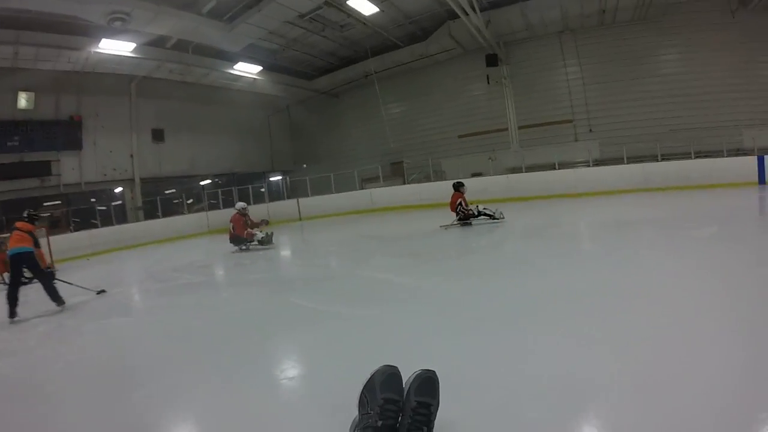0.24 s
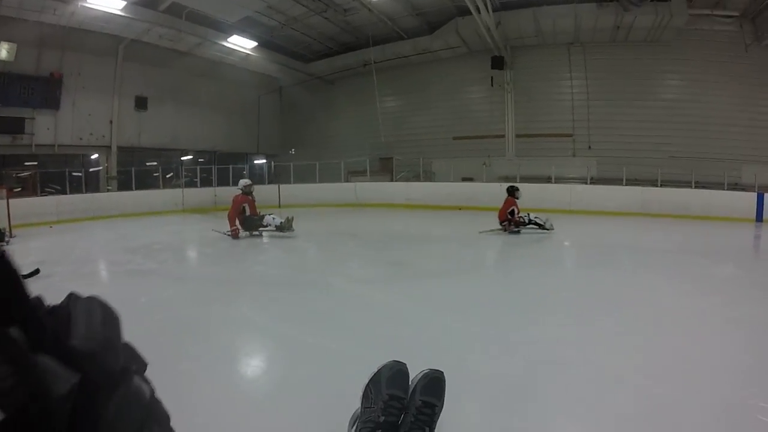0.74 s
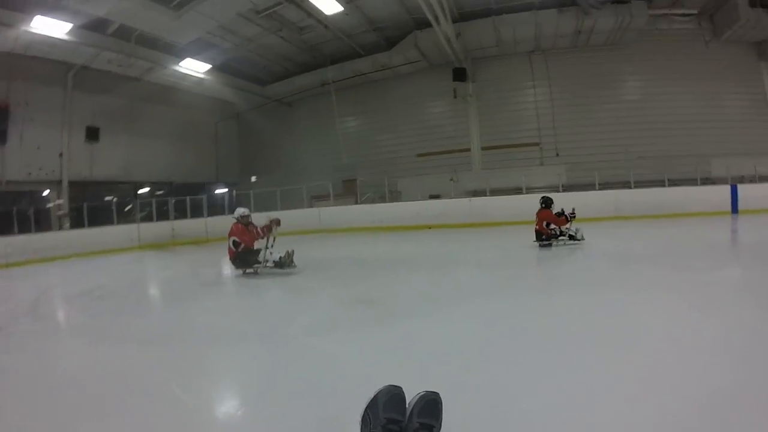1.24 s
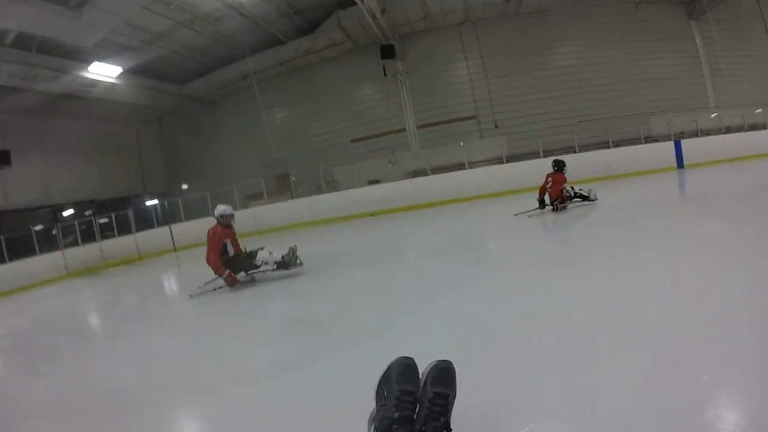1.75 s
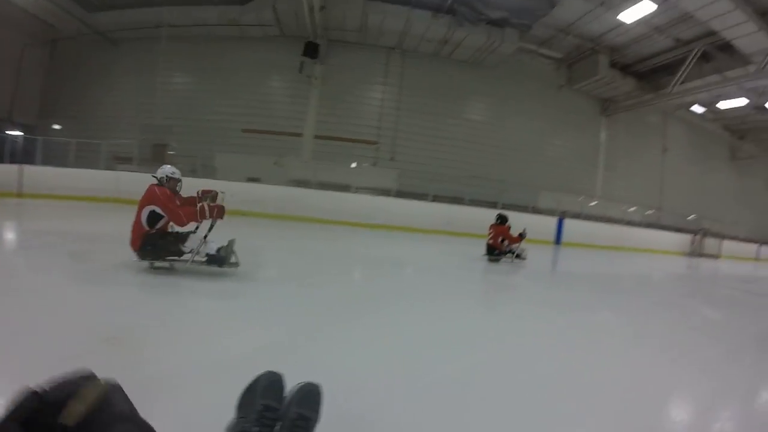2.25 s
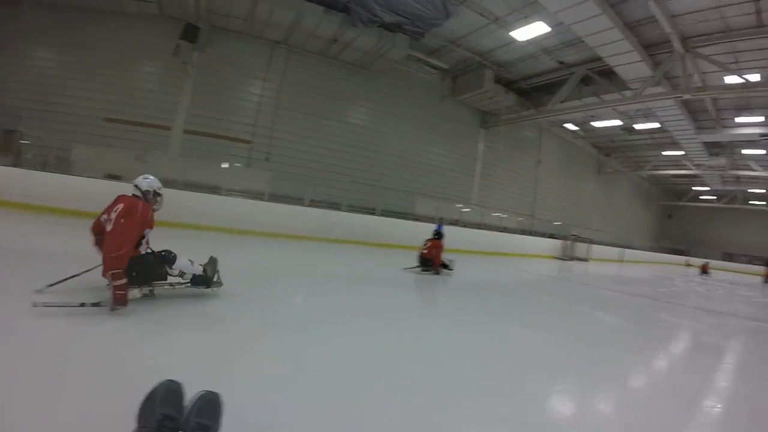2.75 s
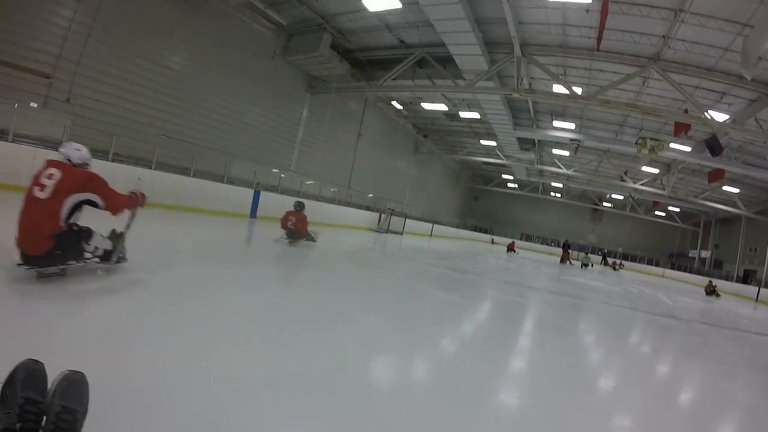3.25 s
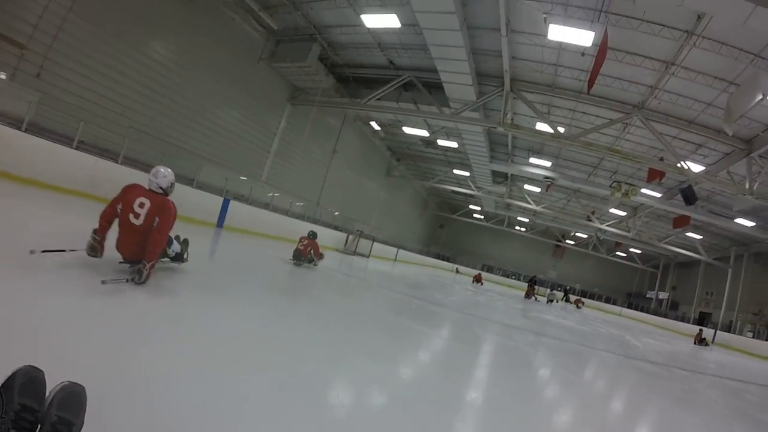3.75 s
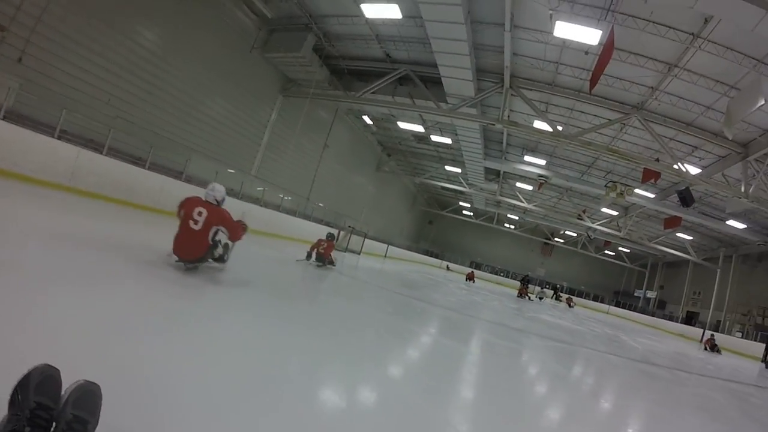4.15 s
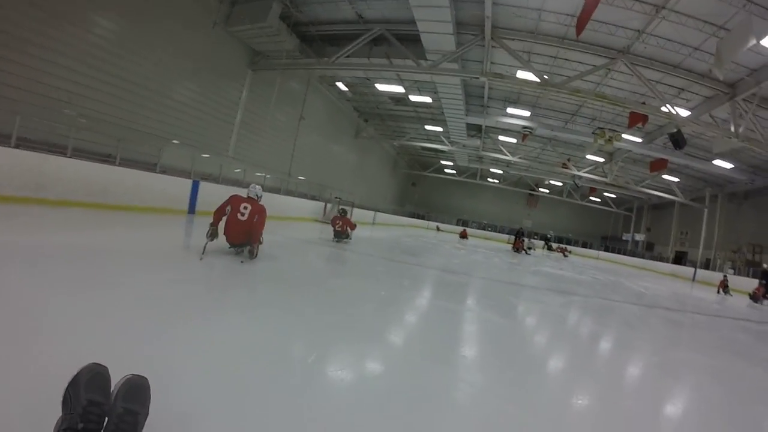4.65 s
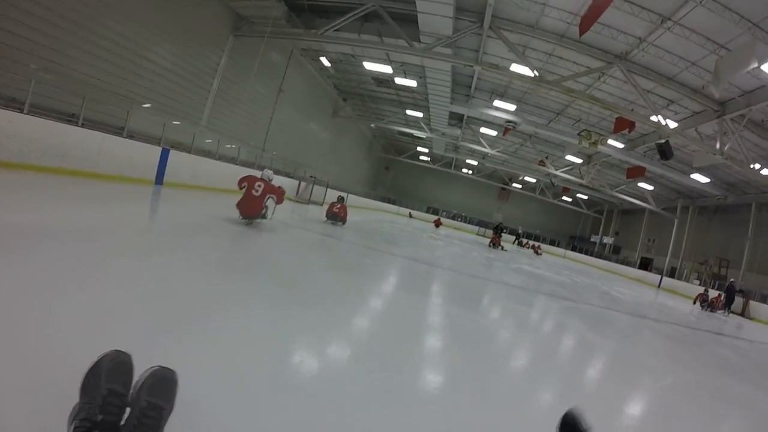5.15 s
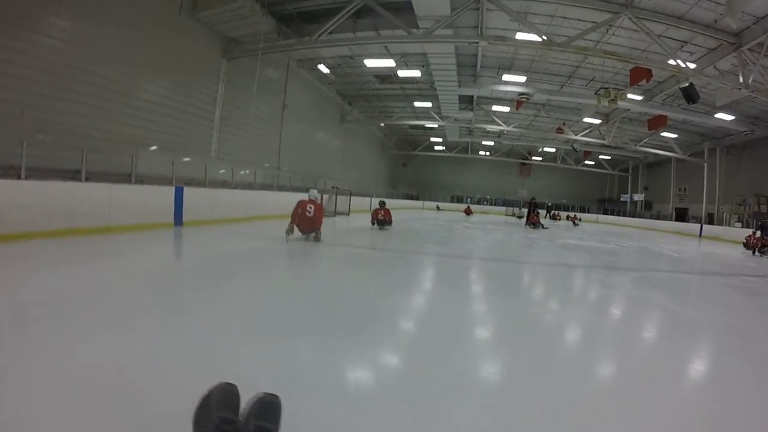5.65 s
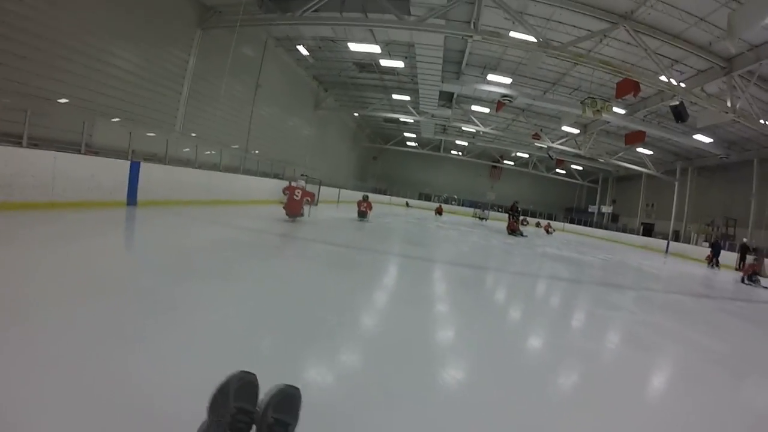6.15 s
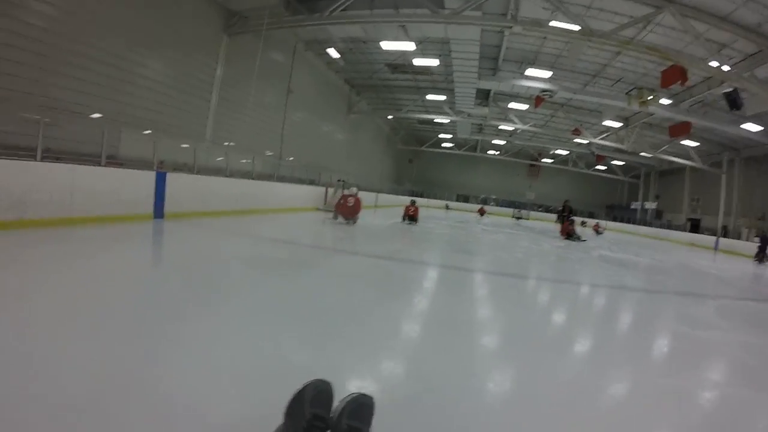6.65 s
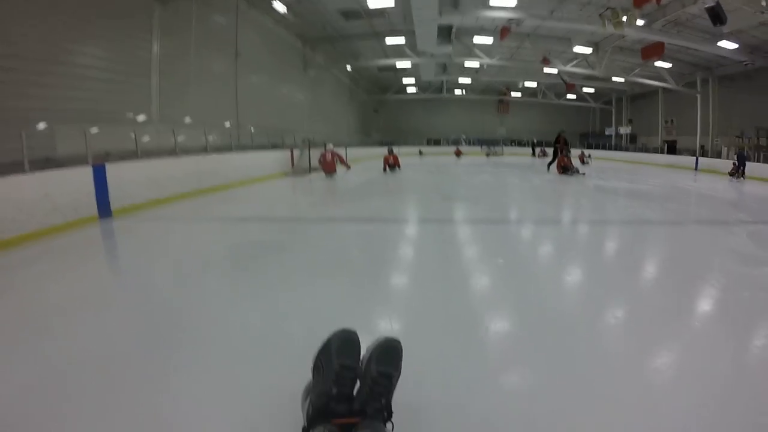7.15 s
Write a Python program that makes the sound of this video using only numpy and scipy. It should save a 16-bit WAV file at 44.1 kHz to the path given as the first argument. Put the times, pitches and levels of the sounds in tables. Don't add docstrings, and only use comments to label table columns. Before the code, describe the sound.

A hockey sled glides over indoor rink ice with low rumble and blade scrape, clicking picks, dull knocks and two heavy thumps.

```python
import sys
import numpy as np
from scipy import signal
from scipy.fft import rfft, irfft
from scipy.io import wavfile

SR = 44100
rng = np.random.default_rng(int(sys.argv[2]) if len(sys.argv) > 2 else 0)


def magnitude_from_level(level_db):
    exponent = np.asarray(level_db, float) / 20
    return 10 ** exponent


def log_audio(samples):
    frames = np.atleast_2d(samples).T
    limited = np.clip(frames, -1, 1)
    pcm = np.round(limited * 32767).astype(np.int16)
    wavfile.write(sys.argv[1], SR, pcm)


N = 326340

# frequency in Hz, level in dB.
WALLS = [(250, -2.5), (390, -6), (1180, -10.5), (1890, -4), (2740, -1), (3300, -1.5), (3740, -11.5),
         (4910, -19.5), (6800, -23), (7800, -26), (9500, -27), (11500, -37), (15000, -49)]
# centre in Hz, width in Hz, lift in dB.
CAVITIES = [(645, 200, -1), (1560, 403, 12), (2270, 330, 6.5), (3094, 91, 3), (4360, 660, 10.5),
            (5870, 1370, 11)]

# widest swing in seconds, level in dB, pitch in Hz, half length
# in seconds.
SWINGS = [(0.017, -33.5, 56, 0.025), (0.1, -37.5, 46.0, 0.03), (0.211, -31, 53.3, 0.073),
          (0.425, -36, 52.0, 0.041), (0.53, -28.5, 48.3, 0.081), (0.654, -31, 49.8, 0.045),
          (0.73, -25.5, 53.4, 0.026), (0.788, -28, 51.4, 0.042), (0.914, -31.4, 54, 0.036),
          (1.052, -22.5, 49.4, 0.06), (1.241, -35, 49.7, 0.059), (1.406, -30.5, 48.4, 0.042),
          (1.792, -31, 51.7, 0.051), (1.944, -34.5, 54, 0.055), (2.031, -36.5, 50.5, 0.049),
          (2.128, -31, 51.2, 0.041), (2.289, -28.5, 48.6, 0.029), (2.347, -32, 53.5, 0.03),
          (2.472, -35, 51, 0.053), (2.554, -30, 52.5, 0.051), (2.81, -32, 53.3, 0.064),
          (3.055, -28.5, 50.7, 0.095), (3.474, -29.5, 48.4, 0.041), (3.624, -37, 55.1, 0.054),
          (3.717, -31.0, 52.3, 0.029), (3.792, -33.0, 52, 0.016), (3.846, -32, 45, 0.036),
          (3.984, -30, 52.3, 0.076), (4.106, -29.5, 52.3, 0.022), (4.202, -35, 53.3, 0.054),
          (4.308, -30.5, 46.7, 0.027), (4.435, -33, 47.5, 0.11), (4.679, -34.7, 56.7, 0.031),
          (4.898, -27.5, 51.7, 0.024), (5.066, -32.5, 52.4, 0.051), (5.401, -28, 48, 0.021),
          (5.492, -31.5, 46, 0.038), (5.626, -36, 53.3, 0.034), (5.673, -34, 49, 0.048),
          (5.779, -34.2, 48.4, 0.026), (5.892, -31.5, 44.7, 0.026), (6.015, -33.5, 47.2, 0.11),
          (6.11, -31, 51, 0.041), (6.24, -32.5, 51, 0.036), (6.366, -33.4, 52.5, 0.06),
          (6.59, -32.4, 47.8, 0.044), (6.893, -37, 46, 0.036), (6.971, -35, 48.4, 0.028),
          (7.026, -36, 46.7, 0.024), (7.083, -31.5, 51.3, 0.026),
          (1.329, -38, 50.0, 0.031), (1.486, -34, 47.8, 0.034), (2.682, -36, 51, 0.06),
          (2.93, -31.5, 52.0, 0.025), (3.22, -43, 49, 0.057), (3.339, -37, 50.5, 0.043),
          (4.372, -28, 50.0, 0.022), (4.53, -37.5, 52.0, 0.023), (4.604, -37, 50.0, 0.036),
          (4.782, -41.5, 50.0, 0.053), (5.19, -40.5, 50.4, 0.033), (5.296, -41.5, 49.5, 0.049),
          (6.471, -42.5, 52.4, 0.035), (7.17, -38, 48.3, .035), (7.259, -39, 50.0, 0.034),
          (7.359, -40, 51, 0.034)]
STILL_DB, FALL_OVER_RISE = -51, 0.89
HARD_JOLT_DB = -15
KICK_HZ, KICK_DB, KICK_SHARE = 50.7, -16.5, 0.56
KICK_LAG_S, KICK_RISE_S, KICK_FALL_S = 0.01, 0.01, 0.069

# time in seconds, level in dB.
BUMPS = [(0.0, -58), (0.49, -58.5), (1.19, -55.5), (1.44, -48.5), (1.89, -59.5), (2.53, -53), (2.97, -54),
         (3.52, -57), (3.83, -54), (4.66, -58), (5.07, -54.5), (5.13, -54.5), (5.59, -52.5), (5.93, -54.5),
         (6.37, -58), (6.62, -50), (7.03, -55.5), (7.4, -55)]
# centre in Hz, width in Hz, level in dB.
FRAME_MODES = [(69, 20, -1.5), (107, 38, -10), (173.2, 25, 2.5), (256, 39, -4)]

# start in seconds, level in dB, length in seconds, edge brightness in dB.
STROKES = [(-.05, -43.5, 0.15, 2.5), (0.606, -51.5, 0.35, 9), (0.928, -42, 0.12, -3), (1.084, -46, 0.15, 2),
           (1.24, -48.5, 0.16, -8), (1.45, -56.5, 0.25, 15.5), (1.703, -45.5, 0.39, 5.5),
           (2.36, -49, 0.31, 7.5), (2.76, -45, 0.68, 0), (3.435, -44, 0.22, -2.5), (3.787, -39.5, 0.35, 3),
           (4.34, -42, 0.23, 3), (4.456, -42, 0.36, 0.5), (4.617, -49.5, 0.16, -9), (4.817, -51, 0.41, -18),
           (5.21, -45.5, 0.11, 2), (5.31, -42.5, 0.32, 1.5), (5.693, -39.5, 0.43, -0.5),
           (5.996, -42, 0.57, -1.5), (6.797, -44.5, 0.22, 1), (7.19, -49, 0.3, 10)]
STROKE_ATTACK_S, STROKE_RELEASE_S = 0.051, 0.21
# steady glide in dB, stroke in dB, share of edge brightness as a ratio.
BLADE_BANDS = [
    (-55.5, -12.5, -0.27),
    (-50, -3.5, -0.18),
    (-57.5, -10.5, 0.74),
    (-79, -32.5, 0.96),
]
BAND_EDGES_HZ = [320, 1250, 3700, 7500]

HISS_DB = -74

# time in seconds, peak in dB, pitch in Hz, rattle share in dB, seat share in dB.
KNOCKS = [(0.293, -31.5, 183, -26, -20), (0.486, -27, 153, -16.5, -14), (0.831, -44.5, 162, -6, 2.5),
          (0.888, -25, 180, -23, -18), (1.238, -25.5, 156, -12, -11.5), (1.407, -30.5, 139, -18, -28),
          (1.449, -29, 177, -36, -28), (1.631, -31.5, 187, -9.5, -5), (2.115, -24.5, 159, -11, -10.5),
          (2.461, -23.5, 206, -22.5, -11.5), (2.826, -26, 154, -12, -13.5), (2.962, -27.5, 165, -13.5, -6),
          (3.261, -25, 183, -30, -21), (3.768, -36, 238, -26, -6), (3.869, -29, 176, -30, -12),
          (4.843, -42, 202, -30, -15), (3.717, -31, 138, -31, -15), (3.815, -19.5, 216, -36, -12.5),
          (4.275, -22.5, 175.7, -43, -40), (4.459, -25.5, 157, -45, -18), (6.356, -29.5, 187, -15.5, -12),
          (6.532, -27.5, 184, -26, -25), (6.595, -27.5, 148, -29, -15), (6.711, 0, 168.5, -44, -27),
          (6.753, -25, 154, -15.5, -11.5), (7.26, -33, 221, -17, -13.5), (7.359, -27.5, 157, -25, -14)]
# time in seconds, peak in dB, rattle share in dB, seat share in dB.
THUDS = [(0.135, -36, -32, -25), (0.653, -38, -30, -25), (3.095, -37, -28, -25), (3.613, -50, -32, -25),
         (4.354, -31.5, -30, -27), (5.581, -31, -26, -25), (6.637, -24.5, -29, -26),
         (0.448, -44.5, -6.5, 3), (1.541, -10, -22.5, -21), (2.137, -27, -40, -25),
         (2.364, -29.5, -32, -19), (2.658, -36, -16.5, -28), (4.3, -40, -35, -24),
         (5.388, -27.5, -22, -18.5), (5.508, -28, -26.5, -20.5), (5.91, -26, -29, -17.5),
         (7.11, -32.5, -27, -24), (7.174, -34, -23, -12)]
# frequency in Hz, level in dB, t60 in seconds.
RATTLE_MODES = [(302, 5, 0.011), (454, 6.5, 0.017), (500, 3.5, 0.015), (558, -11.5, 0.063), (704, 3, 0.016),
                (864, -14, 0.027), (1104, -4, 0.015)]
THUD_HZ, SEAT_HZ = 109.7, 253.5
KNOCK_T60_S, SEAT_T60_S = 0.084, 0.073
SOFT_CONTACT_S, HARD_CONTACT_S = 0.016, 0.0095

# time in seconds, peak in dB, ring in Hz.
CHIPS = [(0.138, -37.5, 7180), (0.628, -35.5, 5900), (0.6454, -38, 5800), (0.963, -46, 5380),
         (0.9832, -30.5, 6420), (1.0081, -42, 5850), (1.0859, -36, 5730), (1.1605, -27.5, 5700),
         (1.282, -47, 5740), (1.3887, -53, 5700), (1.4195, -37.5, 6070), (1.495, -42, 5730),
         (1.7729, -40, 5660), (2.036, -40, 6400), (2.165, -46, 5780), (2.2992, -40, 6090),
         (2.4039, -41, 5880), (2.4324, -37, 5210), (2.6673, -45, 5510), (2.801, -44, 5740),
         (2.81, -40, 5990), (2.9512, -48, 5830), (3.0565, -40.5, 6230), (3.146, -42, 5050),
         (3.4037, -38, 5680), (3.4425, -41, 5610), (3.4605, -47, 5630), (3.4725, -46, 5690),
         (3.5159, -48, 5620), (3.5448, -45, 5580), (3.5593, -40, 5640), (3.8282, -40, 5940),
         (4.0532, -40, 5690), (4.2645, -33.5, 5500), (4.3809, -46, 5620), (4.4458, -39, 5870),
         (4.813, -46, 5800), (4.942, -39, 6000), (5.3542, -35, 5820), (5.391, -37.5, 5900),
         (5.7173, -43, 5850), (5.9983, -37, 6150), (6.0232, -44, 5670), (6.4418, -52, 5420),
         (6.5909, -37, 5840), (6.6174, -34, 6170), (6.8964, -38, 5750), (7.1831, -43, 5920),
         (7.25, -39, 5530), (7.268, -38, 6120)]
# time in seconds, peak in dB, ring in Hz.
SPLINTERS = [(0.627, -56, 8860), (0.6669, -61, 8870), (0.9817, -53, 8550), (1.0859, -55, 8770),
             (1.1603, -51, 9300), (1.282, -62, 9210), (1.3254, -57, 9110), (1.3872, -66, 10200),
             (1.4192, -55, 8680), (2.0926, -53, 10400), (2.2997, -57, 8880), (2.4329, -53, 8650),
             (2.6469, -58, 9190), (2.6673, -53, 9720), (2.6933, -55, 8720), (2.7911, -56, 8640),
             (2.9048, -80, 10500), (2.9497, -65, 8820), (3.018, -65, 8790), (3.055, -51, 9210),
             (3.1457, -49, 8800), (3.4027, -51, 9630), (3.8122, -51, 8770), (3.9913, -60, 8850),
             (4.0512, -53, 8790), (4.136, -56, 8770), (4.2703, -47, 10700), (4.3445, -57, 9650),
             (4.4463, -51, 8710), (4.9407, -71, 8710), (5.227, -65, 8540), (5.3502, -52, 9220),
             (5.3906, -53, 8880), (5.4365, -56, 8610), (5.6979, -58, 8660), (5.7199, -58, 8590),
             (6.0212, -64, 9050), (6.0581, -62, 8870), (6.2048, -59, 8920), (6.5924, -55, 9340),
             (6.6164, -50, 8950), (6.8952, -52, 8860), (7.1826, -62, 8640), (7.2509, -49, 8630),
             (7.2694, -56, 8540)]
# time in seconds, length in seconds.
SPRAYS = [(0.982, 0.0041), (1.157, 0.015), (4.266, 0.0039), (3.053, 0.011), (1.7, 0.0087), (4.6, 0.0052)]

# time in seconds, peak in dB, strongest ring in Hz, sharp edge share in dB.
PICKS = [(0.9838, -31, 3200, -11), (1.0859, -41, 3300, -11), (1.1614, -36, 2940, -11),
         (2.088, -39, 3300, -8.5), (0.1404, -36, 2530, -16), (1.7394, -34, 2400, -30),
         (1.852, -32, 2800, -28), (2.393, -32.5, 2220, -23), (2.5338, -35.5, 1530, -30),
         (2.9243, -34.5, 1520, -28), (3.2355, -33, 2350, -30), (3.265, -33, 2420, -19),
         (3.5133, -31, 1530, -28), (3.5447, -32, 1570, -22), (4.6374, -32.5, 1510, -30),
         (4.68, -37, 1560, -11), (5.229, -34, 2250, -27), (5.3893, -36, 3200, -18), (5.951, -33, 3120, -14),
         (7.1125, -39, 1490, -23), (0.3087, -31, 1460, -25), (0.3863, -27.5, 1490, -31),
         (0.625, -39, 1440, -26), (1.42, -35.5, 1450, -14), (2.146, -22, 1560, -28),
         (2.4015, -28, 3020, -15), (2.4349, -32, 2200, -13.5), (2.6242, -32, 1430, -25),
         (2.7836, -33.5, 2260, -35), (3.145, -32.5, 3140, -17), (3.443, -26, 1600, -36),
         (3.812, -36, 2295, -18), (4.0528, -35, 1670, -7), (4.144, -30.5, 1580, -29),
         (4.27, -28.5, 2620, -23.5), (5.354, -25.5, 1410, -9), (5.7004, -29, 2620, -14.5),
         (5.7338, -25.5, 2600, -20), (5.7658, -31, 1880, -15), (6.0007, -19.5, 2300, -38),
         (6.024, -23, 2460, -37), (6.5909, -28, 1620, -9), (6.6165, -29.5, 2760, -12),
         (6.755, -32.5, 1480, -19), (6.8214, -34, 2690, -21.5), (6.894, -36.5, 3200, -8),
         (7.1894, -34.5, 2300, -14), (7.269, -29.5, 2380, -8), (7.2842, -24.5, 2900, -38),
         (7.3062, -31, 1390, -32)]
# time in seconds, peak in dB, strongest ring in Hz, sharp edge share in dB.
TAPS = [(.965, -15.5, 1720, -16.5), (1.006, -45, 1490, -17), (1.5444, -28.5, 1630, -25),
        (3.0473, -29.5, 2280, -21), (4.263, -27.5, 1560, -5.5), (6.0503, -26.5, 1410, -23),
        (6.2401, -28, 2570, -18), (6.315, -31, 2230, -8), (6.4616, -26.5, 2270, -22),
        (7.2516, -23, 2307, -36), (7.3388, -35, 1417, -9)]
POINT_KNOCK_DB, FLAT_KNOCK_DB = -16, -10
POINT_SNAP, FLAT_SNAP = 2.5, 8
HALL_T60_S, HALL_DB, HALL_GAP_S = 0.83, -16.5, 0.032

# start in seconds, level in dB, length in seconds, centre in Hz.
SKIDS = [(1.75, -78.5, .42, 10400), (1.75, -90, .4, 13000), (1.75, -67, .3, 7100), (1.49, -62, .06, 5900),
         (4.33, -77, .3, 9600), (6.08, -79, .25, 8800), (6.98, -87, .08, 11500), (.97, -90, .15, 13000)]
SKID_WIDTH = 0.14

# time in seconds, level in dB, t60 in seconds.
FAR_SLAPS = [
    (1.0, -64, 0.44),
    (6.045, -40.5, 4),
]


def rms_one(x):
    return x / np.sqrt(np.mean(x ** 2) + 1e-20)


def in_time(rows):
    s, *columns = np.transpose(rows)
    return [np.interp(np.arange(N) / SR, s, c) for c in columns]


def drift(rate_hz):
    r = np.exp(-80 * np.pi * rate_hz / SR)
    slow = signal.lfilter([1], [1, -2 * r, r * r], rng.standard_normal(N // 40 + 2002))[2000:]
    return np.interp(np.arange(N) / 40, np.arange(len(slow)), rms_one(slow))


def passband(x, low_hz, high_hz, order=2):
    return signal.sosfilt(signal.butter(order, [low_hz, high_hz], "band", fs=SR, output="sos"), x)


def resonance(x, hz, width_hz):
    r = np.exp(-np.pi * width_hz / SR)
    poles = [1, -2 * r * np.cos(2 * np.pi * hz / SR), r * r]
    return signal.lfilter([(1 - r * r) / 2, 0, (r * r - 1) / 2], poles, x)


def add(track, s, sound, peak_db):
    at = round(s * SR)
    sound = sound[:N - at]
    track[at:at + len(sound)] += magnitude_from_level(peak_db) * sound / np.max(np.abs(sound))


def housing_response(size=2048):
    hz = np.maximum(np.fft.rfftfreq(size, 1 / SR), 1)
    wall_hz, wall_db = np.transpose(WALLS)
    level_db = np.interp(np.log(hz), np.log(wall_hz), wall_db)
    for top_hz, width_hz, lift_db in CAVITIES:
        level_db = level_db + lift_db / (1 + (2 * (hz - top_hz) / width_hz) ** 2)
    cepstrum = irfft(np.log(magnitude_from_level(level_db)))
    cepstrum[1:size // 2] *= 2
    cepstrum[size // 2 + 1:] = 0
    return irfft(np.exp(rfft(cepstrum)))[:size // 2]


def wobble(sway_db=-40.5, follow=0.2, waver=0.031):
    t, out, power = np.arange(N) / SR, np.zeros(N), magnitude_from_level(2 * STILL_DB)
    wander = np.cumsum(waver * drift(13.0)) / SR
    swings = SWINGS
    pushes = [(s, db, hz, half_s, FALL_OVER_RISE * half_s, turn)
              for (s, db, hz, half_s), turn in zip(swings, rng.random(len(swings)))]
    kicks = [(s + KICK_LAG_S, KICK_DB + KICK_SHARE * db, KICK_HZ, KICK_RISE_S, KICK_FALL_S, KICK_LAG_S * KICK_HZ)
             for s, db, *_ in KNOCKS + THUDS if db > HARD_JOLT_DB]
    for s, db, hz, rise_s, fall_s, turn in pushes + kicks:
        near = slice(max(round((s - 3 * rise_s) * SR), 0), round((s + 3 * fall_s) * SR))
        bell = magnitude_from_level(db) * np.exp(-((t - s) / np.where(t < s, rise_s, fall_s)) ** 2)
        cycles = hz * (t[near] - s + wander[near] - wander[round(s * SR)]) + turn
        out[near] += np.sqrt(2) * bell[near] * np.cos(2 * np.pi * cycles)
        power = power + bell ** 2
    level_db = 10 * np.log10(power)
    sway = rms_one(passband(rng.standard_normal(N), 17.3, 48.8) * magnitude_from_level(1.3 * drift(16.0)))
    return magnitude_from_level(1.0) * out + magnitude_from_level(sway_db + follow * (level_db - level_db.mean())) * sway


def frame_rumble(level_db, lumpy_db=4.0):
    bumps = rng.standard_normal((len(FRAME_MODES), N))
    shake = 0
    for bump, (hz, width_hz, db) in zip(bumps, FRAME_MODES):
        shake = shake + magnitude_from_level(db + lumpy_db * drift(4.1)) * resonance(bump, hz, width_hz)
    return magnitude_from_level(level_db + 3.0) * rms_one(shake)


def carving_db():
    t = np.arange(N) / SR
    shapes = []
    for s, _, length_s, _ in STROKES:
        fade = np.exp(-np.maximum(t - s - length_s, 0) / STROKE_RELEASE_S)
        shapes.append(np.clip((t - s) / STROKE_ATTACK_S, 0, 1) * fade)
    levels_db = []
    for glide_db, stroke_db, share in BLADE_BANDS:
        power = magnitude_from_level(2 * glide_db)
        for (_, db, _, bright_db), shape in zip(STROKES, shapes):
            power = power + magnitude_from_level(2 * (db + stroke_db + share * bright_db)) * shape ** 2
        levels_db.append(10 * np.log10(power))
    return levels_db


def blades(housing, levels_db, grains_per_s=1800, grain_db=4.0, grain_mix_db=-2.5):
    sizes = magnitude_from_level(grain_db * np.minimum(rng.exponential(1, N), 5)) * rng.choice([-1, 1], N)
    cracks = sizes * (rng.random(N) < grains_per_s * magnitude_from_level(drift(25)) / SR)
    contact = rng.standard_normal(N) + magnitude_from_level(grain_mix_db) * rms_one(cracks)
    source = signal.fftconvolve(contact, housing)[:N]
    edges, together = BAND_EDGES_HZ + [12000], drift(18)
    out = 0
    for low, high, db in zip(edges, edges[1:], levels_db):
        flicker_db = 0.6 * (together + drift(25))
        band = rms_one(passband(source, low, high, order=3))
        streak = resonance(band, low ** 0.7 * high ** 0.3, low / 5) * drift(6)
        streak = streak + resonance(band, low ** 0.3 * high ** 0.7, low / 3) * drift(6)
        out = out + magnitude_from_level(db + flicker_db) * (band + 0.19 * streak)
    return out


def hiss(housing):
    noise = signal.fftconvolve(rng.standard_normal(N), housing)[:N]
    return magnitude_from_level(HISS_DB + 1.7 * drift(20.5)) * rms_one(passband(noise, 11600, 17700))


def knocks():
    out, t = np.zeros(N), np.arange(SR // 3) / SR
    jolts = KNOCKS + [(s, db, THUD_HZ, *shares) for s, db, *shares in THUDS]
    for (s, db, hz, rattle_db, seat_db), z in zip(jolts, rng.standard_normal((len(jolts), 10))):
        contact_s = HARD_CONTACT_S if db > HARD_JOLT_DB else SOFT_CONTACT_S
        soft = 1 - np.exp(-t / contact_s)
        body = -np.sin(2 * np.pi * hz * t) - 0.46 * np.sin(2 * np.pi * hz * 0.686 * t + 1.3 * z[0])
        add(out, s - 0.002, soft * body * magnitude_from_level(-60 * t / KNOCK_T60_S), db - 7.5)
        seat = np.sin(2 * np.pi * SEAT_HZ * (1 + 0.062 * z[7]) * t) * magnitude_from_level(-60 * t / SEAT_T60_S)
        add(out, s, soft * seat, db + seat_db + 0.5)
        rattle = 0
        for (mode_hz, mode_db, t60_s), a, b in zip(RATTLE_MODES, z, z[3:]):
            ring = np.sin(2 * np.pi * mode_hz * (1 + b / 40) * t + a)
            rattle = rattle + magnitude_from_level(mode_db + 2 * a - 60 * t / t60_s) * ring
        rattle = rattle * (1 - np.exp(-t / 0.0044))
        add(out, s + 0.004, rattle, db + rattle_db + 9.5)
        add(out, s + 0.015 + 0.00172 * z[9], rattle, db + rattle_db - 2.5)
    return out


def crunch(length_s, white, snap):
    t = np.arange(len(white)) / SR / max(length_s, 0.001)
    burst = white * np.minimum(6 * t, 1) * np.exp(-t ** 3.7) * 0.5
    burst[:3] += snap * np.array([1, 0.6, -0.5])
    return burst


def chips(housing, events, low_hz, high_hz, trim_db, ring, width):
    out = np.zeros(N)
    for (s, db, hz), white in zip(events, rng.standard_normal((len(events), 2000))):
        length_s = next((long_s for at, long_s in SPRAYS if abs(at - s) < 0.01), 0.004)
        spit = signal.fftconvolve(crunch(length_s, white, snap=0.93), housing)
        spit = rms_one(passband(spit, low_hz, high_hz, order=3)) + ring * rms_one(resonance(spit, hz, width * hz))
        add(out, s - 0.15 * length_s, spit, db + trim_db)
    return out


def picks(housing):
    out = np.zeros(N)
    blows = [(*row, POINT_KNOCK_DB, POINT_SNAP) for row in PICKS]
    blows += [(*row, FLAT_KNOCK_DB, FLAT_SNAP) for row in TAPS]
    for (s, db, hz, edge_db, dull_db, snap), white in zip(blows, rng.standard_normal((len(blows), 2000))):
        bite = signal.fftconvolve(crunch(0.0058, white, snap), housing)
        add(out, s, rms_one(passband(bite, 1320, 3700)) + 2.1 * rms_one(resonance(bite, hz, 330)), db - 0.5)
        add(out, s, passband(bite, 760, 1430), db + dull_db + 8.5)
        add(out, s, passband(bite, 3650, 4770), db + edge_db + 10.5)
    return out


def hall(x):
    t = np.arange(int(1.5 * SR)) / SR
    tail = rng.standard_normal(len(t)) * magnitude_from_level(-60 * t / HALL_T60_S) * (t > HALL_GAP_S)
    return magnitude_from_level(HALL_DB) * signal.fftconvolve(x, passband(tail, 630, 4400) / 10)[:N]


def skids(edge_s=0.05, flutter_db=2.5):
    t, white, flutter = np.arange(N) / SR, rng.standard_normal(N), magnitude_from_level(flutter_db * drift(30))
    out = np.zeros(N)
    for s, db, length_s, hz in SKIDS:
        patch = np.clip(np.minimum(t - s, s + length_s - t) / edge_s, 0, 1)
        song = resonance(resonance(white, hz, SKID_WIDTH * hz), hz, SKID_WIDTH * hz)
        out += magnitude_from_level(db) * patch * rms_one(song)
    return flutter * out


def far_slaps():
    t = np.arange(N) / SR
    wash = rms_one(passband(rng.standard_normal(N), 710, 2150))
    wash = rms_one(wash + 2.9 * resonance(wash, 2410, 400))
    level = np.zeros(N)
    for s, db, t60_s in FAR_SLAPS:
        level += np.clip((t - s) / 0.012, 0, 1) * magnitude_from_level(db - 60 * np.maximum(t - s, 0) / t60_s)
    return wash * level


def scene():
    housing = housing_response()
    strap = wobble() + frame_rumble(in_time(BUMPS)[0]) + knocks()
    bites = picks(housing)
    spray = chips(housing, CHIPS, 5170, 7800, trim_db=1.3, ring=1.7, width=0.17)
    spray += chips(housing, SPLINTERS, 8100, 16100, trim_db=3.0, ring=0.25, width=0.12)
    spray += chips(housing, SPLINTERS, 11800, 15500, trim_db=-14.0, ring=0, width=0.1)
    air = blades(housing, carving_db()) + hiss(housing) + spray + bites + hall(bites) + skids() + far_slaps()
    return (strap + air)[None]


def band_limit(x):
    return signal.sosfilt(signal.butter(12, 15100, fs=SR, output="sos"), x)


def record(dry):
    mix = signal.sosfilt(signal.butter(1, 12, "high", fs=SR, output="sos"), dry)
    return band_limit(mix)


dry = scene()
out = record(dry)
log_audio(out)
```